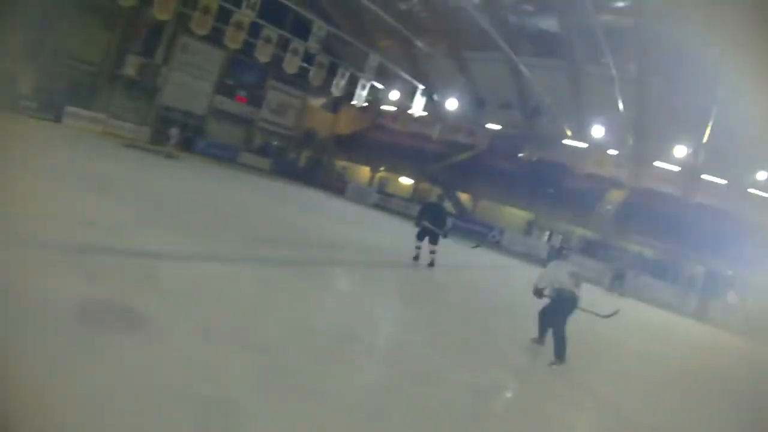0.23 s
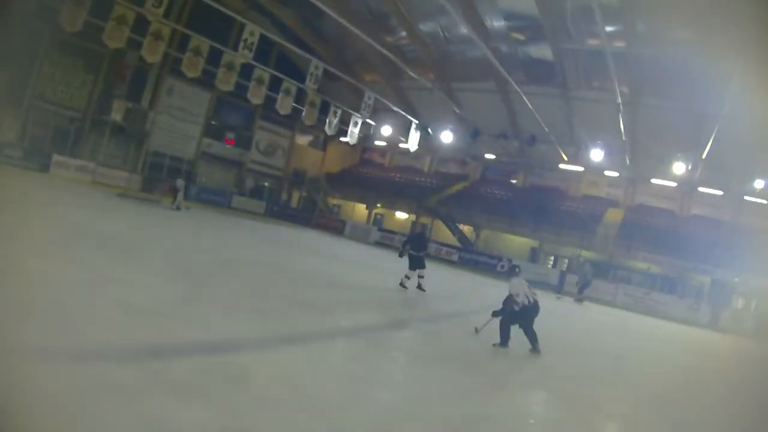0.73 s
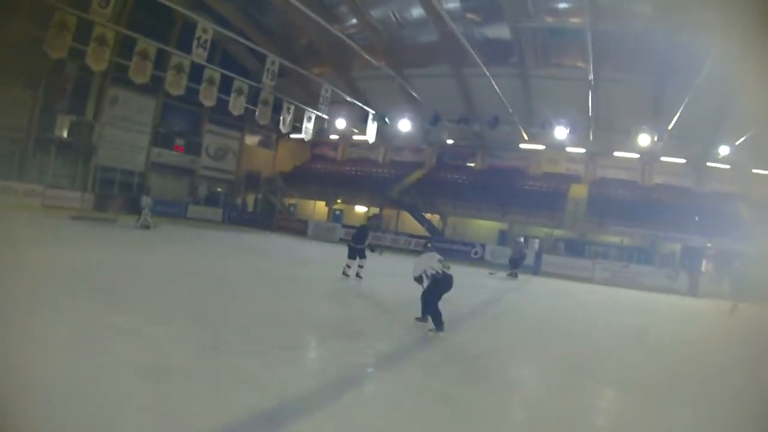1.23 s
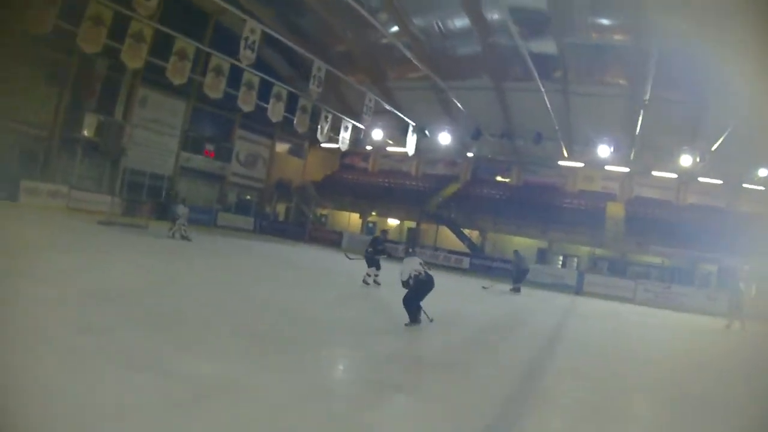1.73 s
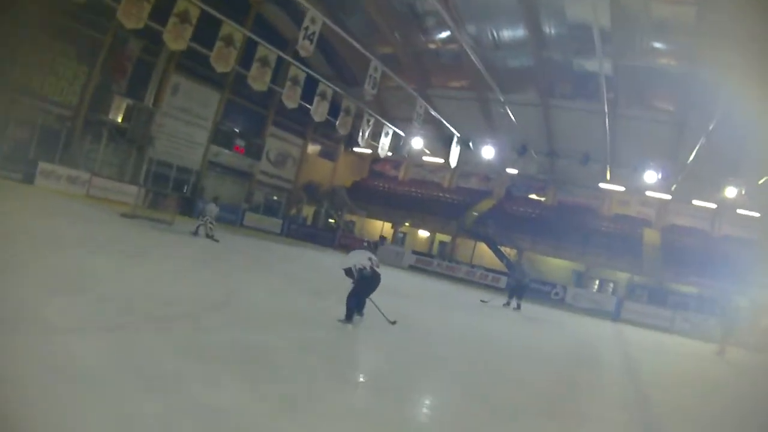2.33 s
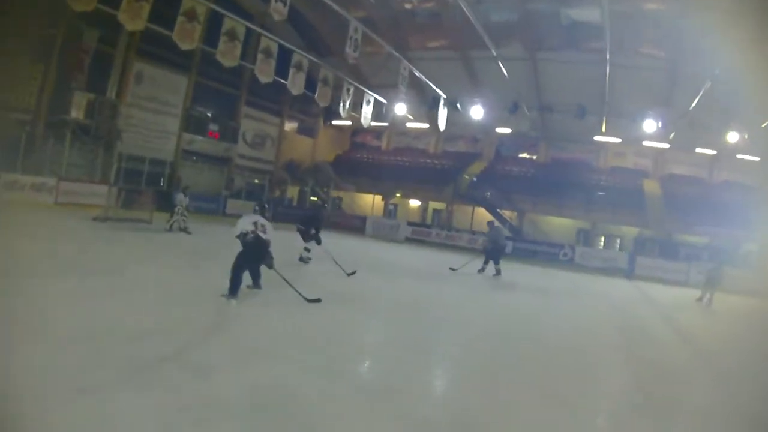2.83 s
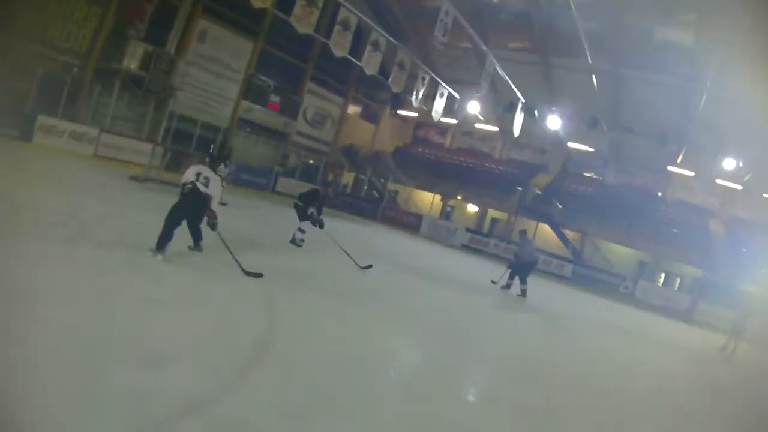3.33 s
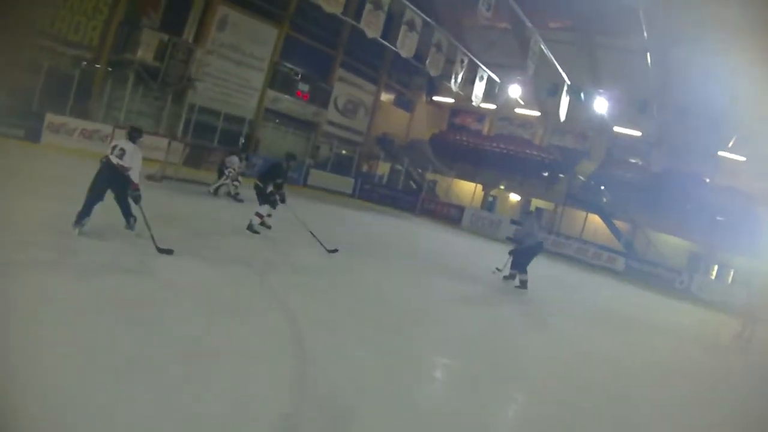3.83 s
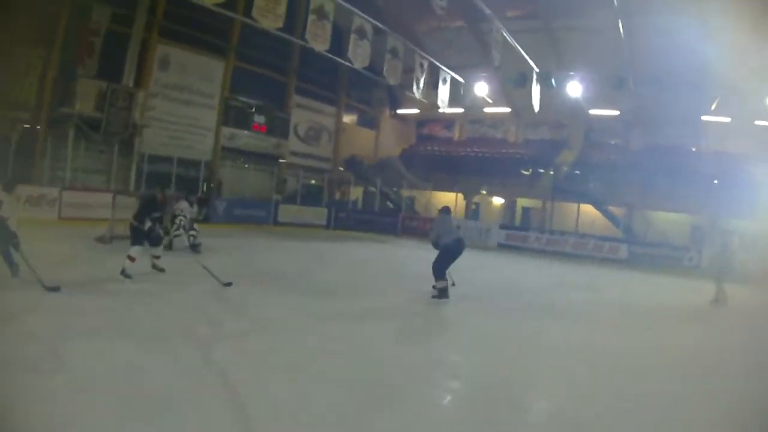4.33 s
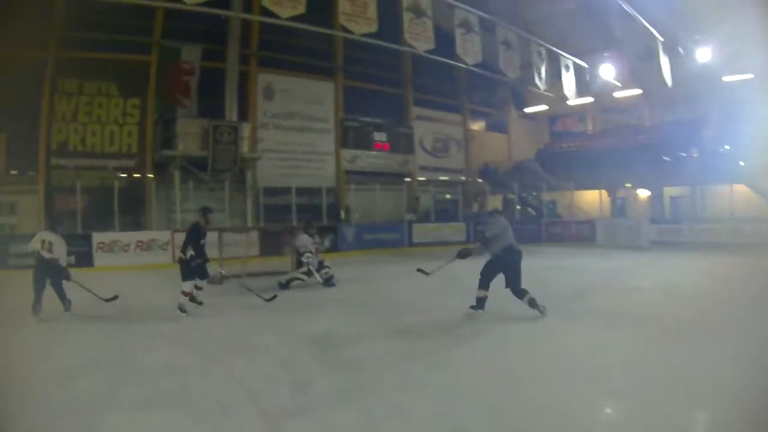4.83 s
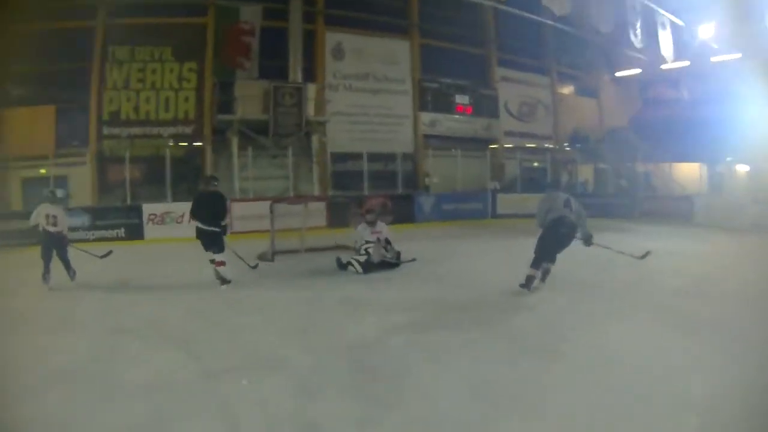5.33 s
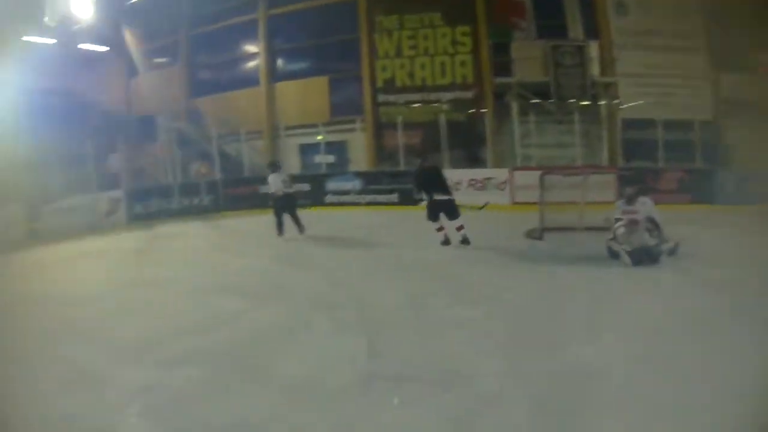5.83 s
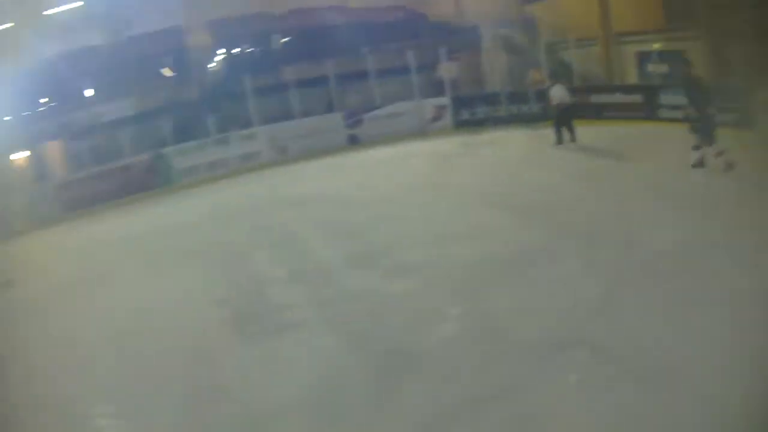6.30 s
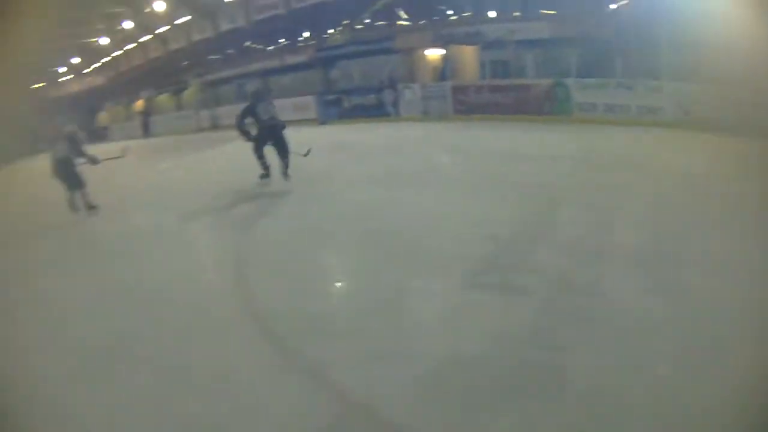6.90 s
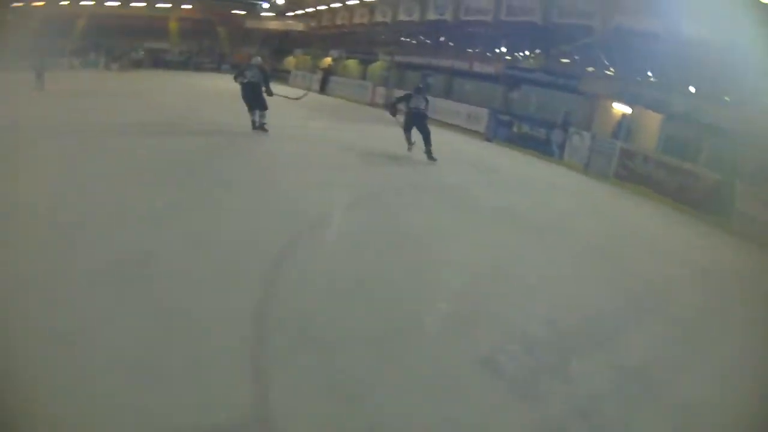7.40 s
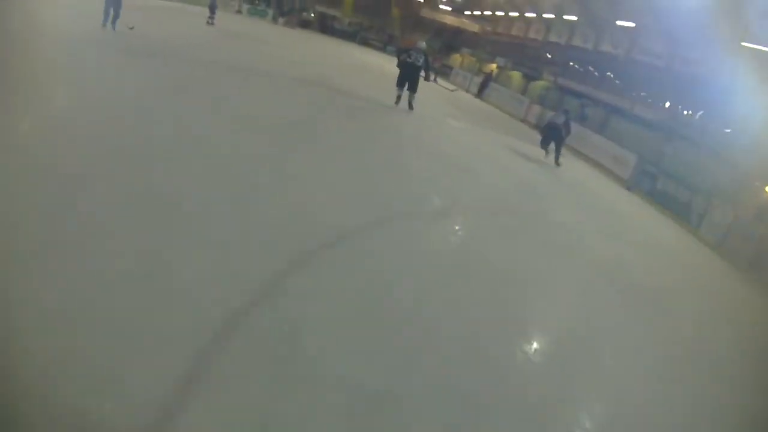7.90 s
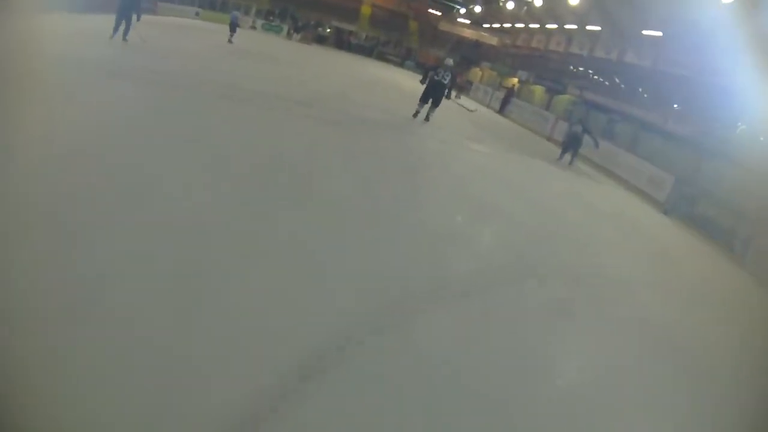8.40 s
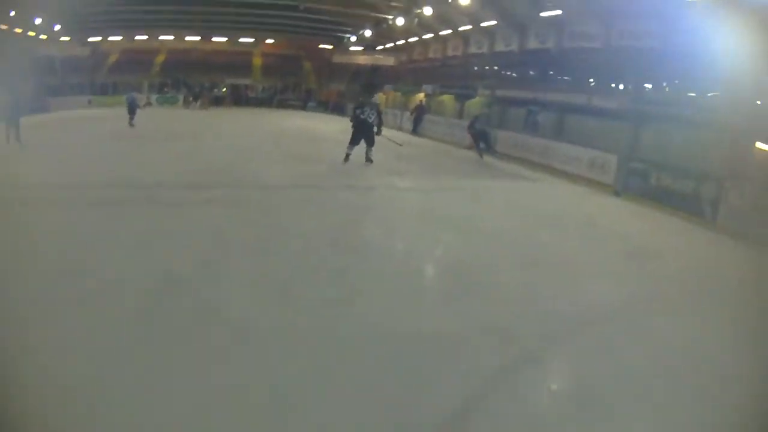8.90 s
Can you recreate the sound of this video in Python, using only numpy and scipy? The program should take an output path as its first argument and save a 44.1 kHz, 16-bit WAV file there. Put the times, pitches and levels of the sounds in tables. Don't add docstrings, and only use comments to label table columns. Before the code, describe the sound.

Skate blades bite and scrape ice in a big indoor rink, with helmet knocks, hard stick-and-puck cracks that echo, and low rumbling air.

```python
import sys
import numpy as np
from scipy import signal
from scipy.fft import rfft, irfft
from scipy.io import wavfile
from scipy.ndimage import uniform_filter1d

SR = 44100
rng = np.random.default_rng(int(sys.argv[2]) if len(sys.argv) > 2 else 0)


def wav_record(signal):
    frames = np.transpose(np.atleast_2d(signal))
    bounded = np.clip(frames, -1, 1)
    quanta = np.round(bounded * 32767).astype(np.int16)
    wavfile.write(sys.argv[1], SR, quanta)


def boost(x):
    u = np.asarray(x, float) / 20
    return 10 ** u


N = 403515
TIME = np.arange(N) / SR


def unit(x):
    return x / np.sqrt(np.mean(x ** 2))


def shape(table, hz):
    point_hz, value = np.transpose(table)
    return np.interp(np.log(hz), np.log(point_hz), value)


def band(x, lo_hz, hi_hz, order=2):
    return signal.sosfilt(signal.butter(order, [lo_hz, hi_hz], "bandpass", fs=SR, output="sos"), x)


def around(x, hz, width_hz):
    return band(x, hz - width_hz / 2, hz + width_hz / 2)


def curves(table):
    s, *columns = np.transpose(table)
    return [np.interp(TIME, s, column) for column in columns]


def walk(rate_hz):
    k = int(SR / rate_hz)
    held = np.repeat(rng.standard_normal(N // k + 1), k)
    slewed = uniform_filter1d(uniform_filter1d(held, k), k)
    return unit(slewed[:N])


def steady(x, span_s):
    local_power = uniform_filter1d(x ** 2, int(span_s * SR))
    return unit(x / np.sqrt(local_power + 0.12 * np.mean(x ** 2)))


def swells(peak_s, rise_s, fade_s, db, under=0.):
    t = TIME[::32]
    late = t - peak_s[:, None]
    rising = -late / np.abs(rise_s)[:, None]
    fading = late / np.abs(fade_s)[:, None]
    fall = np.minimum(np.maximum(rising, fading), 20)
    power = np.sum(boost(db[:, None] - 10 * fall) ** 2, axis=0)
    return np.sqrt(np.interp(TIME, t, power) + under ** 2)


def chips(scatter_db, flicker_db, rate_hz):
    size = boost(scatter_db * uniform_filter1d(rng.exponential(size=N), size=24))
    flicker = boost(flicker_db * walk(rate_hz) + flicker_db * walk(rate_hz * 3))
    return unit(rng.standard_normal(N) * size * flicker)


# time_s, carving_db, edge_brightness_db
SKATING = [(0.0, -46, -10), (0.4, -47.5, -12.5), (0.7, -49, -8), (1.1, -48, -8), (1.64, -43.5, -6.5),
           (2.3, -47, -9.5), (2.6, -46, -8), (3.1, -50, -7), (4.1, -50, -9), (4.56, -48, -9),
           (5.06, -45, -6), (5.95, -37.5, -13), (6.47, -43, -13.5), (6.85, -46, -14), (7.3, -48, -12.5),
           (7.86, -44.5, -13), (8.17, -43, -10), (9.15, -44, -10.5)]
# full_bite_s, rise_s, fade_s (per 10 dB), carving_db, spray_db
STRIDES = [(0.26, 0.096, 0.13, -45, -67), (0.446, .01, 0, -43, -72), (0.574, 0.027, 0.9, -52.5, -72),
           (0.976, 0.049, -0.14, -45.5, -84), (1.68, 0.026, 0.1, -38, -57), (1.75, .05, 0.8, -47, -69),
           (2.57, .1, 1.5, -57, -73), (3.28, 0.028, 0, -48, -79), (3.53, 0.0075, 0, -48, -84.5),
           (4.21, 0.031, 0.3, -46, -71), (4.597, .002, 0.3, -39, -70), (4.647, .004, 0.7, -40.5, -78),
           (4.84, 0.067, 0.3, -43.5, -66), (6.1, .4, -1, -57, -80), (6.256, .1, 3, -59, -80),
           (7.37, 0.022, 1.3, -47, -80), (7.67, .01, -0.2, -43, -80), (7.9, 0.07, .12, -47, -67),
           (8.2, .03, 0.5, -45, -64), (8.362, .004, 0.14, -39.5, -60), (8.421, 0.01, 0.3, -34.5, -59),
           (8.47, .02, 0.18, -36.5, -70), (8.52, .03, 0.64, -37.5, -70), (7.12, .04, -0.1, -46, -78)]


def blades():
    effort_db, edge_db = curves(SKATING)
    s, rise_s, fade_s, bite_db, spray_db = np.transpose(STRIDES)
    bite = swells(s, rise_s, fade_s, bite_db, boost(effort_db))
    ice = housing(chips(scatter_db=8.0, flicker_db=0.9, rate_hz=11.0))
    body = unit(band(ice, 1176, 3145, order=3))
    carve = body + boost(edge_db) * unit(band(ice, 4140, 5680))

    crumble = housing(chips(scatter_db=-4.0, flicker_db=3.5, rate_hz=11.0))
    grind = steady(band(crumble, 185, 900), span_s=0.14)
    weight = boost(-58) * (uniform_filter1d(bite, size=4096) / boost(-46)) ** 0.5

    flakes = chips(scatter_db=11.0, flicker_db=-1.0, rate_hz=8.5)
    spray = steady(band(flakes, 3700, 6960, order=4), span_s=0.12)
    spray_gain = swells(s, rise_s, fade_s, spray_db, boost(effort_db - 33))
    return bite * carve + weight * grind + spray_gain * spray


# start_s, length_s,
# centre_hz, width_hz, level_db
SHAVES = [(1.66, 0.088, 1140, 1030, -40), (1.65, 0.11, 4320, 460, -44), (5.07, 0.44, 4420, 570, -42),
          (4.277, 0.009, 4030, 610, -34.5), (5.069, 0.026, 430, 190, -37.5), (4.66, 0.16, 6900, 400, -71),
          (4.8, .13, 7000, 400, -64), (5.8, 0.24, 5900, 700, -68), (6.0, 0.1, 5740, 560, -67),
          (8.17, 0.16, 6600, 800, -60.5), (8.28, .13, 7000, 600, -64), (8.19, 0.12, 3500, 230, -42.5),
          (8.3, 0.11, 3530, 360, -45), (4.81, .06, 6100, 400, -61), (7.84, .12, 4700, 630, -56),
          (7.859, 0.15, 1800, 530, -43), (8.19, 0.18, 4050, 450, -44), (8.3, 0.14, 3900, 650, -48.5),
          (5.11, .014, 2050, 1700, -32), (5.07, 0.011, 4700, 500, -28), (0.58, 0.14, 210, 90, -53),
          (7, .01, 4000, 900, -48)]


def shaves():
    grain = chips(scatter_db=9.0, flicker_db=3.0, rate_hz=40.)
    out = np.zeros(N)
    for s, length, hz, width_hz, db in SHAVES:
        attack = np.clip((TIME - s) / (0.12 * length), 0, 1)
        decay = np.exp(-(np.maximum(TIME - s, 0) / length) ** 3)
        out += boost(db) * steady(around(grain, hz, width_hz), span_s=0.038) * attack * decay
    return out


# start_s, peak_db, ring_hz, length_s, hall_db
SLAPS = [(0.4415, -28.5, 3080, 0.0093, 3), (1.2022, -35, 1910, 0.013, -3), (1.675, -25, 3340, 0.0064, 4.5),
         (1.735, -28, 1790, 0.01, -7), (2.125, -42, 1590, 0.0096, 9), (5.0682, -11, 2200, 0.012, 4),
         (7.664, -39, 2920, 0.01, -3), (7.888, -38, 1900, 0.013, -6), (8.1965, -38, 3350, 0.0084, 6.5),
         (8.506, -27, 3350, 0.0037, 3), (3.418, -40, 3500, .006, -12), (3.526, -39, 2300, 0.0044, -8),
         (3.555, -39, 3200, .006, -8), (4.663, -30, 3400, 0.0066, -12), (4.787, -40, 1900, .005, 0),
         (4.823, -30, 1700, .006, -8)]
# start_s, peak_db, ring_hz, length_s, hall_db
CLACKS = [
    (4.643, -28.5, 2800, 0.0087, -7),
    (5.1205, -10, 3430, 0.009, -6.5),
    (5.131, -7.5, 3400, 0.0039, -26),
    (6.6636, -29.5, 1800, 0.0057, -1.5),
    (8.4175, -22.5, 2320, 0.0084, -2),
    (8.465, -27, 1690, 0.015, -7),
]
# start_s, peak_db, ring_hz, length_s, hall_db
PINGS = [(1.653, -36.5, 1410, 0.019, -4), (1.675, -33, 1440, .012, -13), (1.706, -35, 1650, 0.017, -10),
         (4.2805, -35.5, 3700, 0.012, -8.5), (7.369, -43.5, 2300, .012, -14),
         (8.017, -40, 2350, 0.016, -11), (8.361, -32, 2220, 0.0081, -3.5),
         (4.593, -28.5, 2370, 0.009, -3.5), (5.325, -23.5, 640, 0.011, -34),
         (8.414, -27.5, 4250, 0.015, -6), (8.419, -29.5, 2230, 0.0095, -5), (4.648, -33.5, 2370, .028, -18),
         (4.594, -36.5, 3000, .01, -12), (1.733, -37, 1700, .01, -9), (0.753, -37, 2370, .008, -15),
         (3.914, -49.5, 3360, 0.0086, 1), (4.975, -41, 1300, .01, -7), (1.6, -43, 3400, 0.009, -27),
         (4.815, -35.5, 2400, 0.011, -18)]


def cracks():
    near, far = np.zeros(N), np.zeros(N)
    t = TIME[:2048]

    def add_ring(x, hz, ring_db):
        return x + boost(ring_db) * 3 * band(x, hz / 1.06, hz * 1.06, order=1)

    for blows, ring_db in ((SLAPS, -15.5), (CLACKS, -3), (PINGS, 29)):
        for s, db, hz, length, hall_db in blows:
            length = max(length, 0.001)
            envelope = np.clip(t / 0.00073, 0, 1) * np.exp(-(t / length) ** 3 - t / 0.09)
            burst = add_ring(rng.standard_normal(len(t)) * envelope, hz, ring_db)
            blow = add_ring(signal.unit_impulse(len(t)), hz, ring_db)
            i = int(s * SR)
            near[i:i + len(t)] += boost(db) * burst * np.sqrt(length * SR / np.sum(burst ** 2))
            far[i:i + len(t)] += boost(db + hall_db) * blow * np.sqrt(length * SR / np.sum(blow ** 2))
    return housing(boost(-8.5) * near + boost(-9.0) * hall(far))


# start_s, peak_db, pitch_hz, t60_s, tap_db
JOLTS = [(0.256, -30.5, 204, 0.028, -1), (0.428, -34, 172, 0.043, -8), (0.442, -23, 176, 0.021, -5.5),
         (0.571, -41.5, 199, 0.13, -11), (1.026, -38, 237, 0.035, -14.5), (1.062, -39, 172, 0.029, 1),
         (1.198, -41, 238, 0.025, -1), (1.555, -37, 172, 0.039, -1), (3.038, -47, 213, 0.037, -8),
         (4.228, -36.5, 230, 0.03, -9), (4.292, -42, 172, 0.04, -11), (4.404, -41.5, 365, 0.033, 1),
         (4.692, -47, 172, 0.04, -11), (4.747, -35, 256, 0.033, -2), (4.805, -42, 275, 0.031, -4),
         (4.856, -36, 245, 0.029, -3), (4.958, -47, 173, 0.043, -1), (5.067, -26, 327, 0.04, 10.5),
         (6.165, -54, 169, 0.033, -8), (7.832, -47, 172, 0.04, -10), (7.899, -27.5, 205, 0.036, -20),
         (7.949, -50, 172, 0.04, -3), (9.046, -35.5, 204, 0.031, -18)]


def jolts():
    out, t = np.zeros(N + 8192), TIME[:8192]
    thud = np.sin(2 * np.pi * 96 * t) * boost(-60 * t / 0.094) * np.clip(t / 0.0077, 0, 1)
    for s, db, hz, t60, tap_db in JOLTS:
        noise = rng.standard_normal(len(t))
        swing = np.sin(2 * np.pi * hz * t * (1 - 1.0 * t)) * boost(-60 * t / t60)
        swing = swing * np.clip(t / 0.0026, 0, 1)
        contact = (1 + 0.54 * noise) * np.exp(-t / 0.00015)
        scuff = 0.31 * noise * np.exp(-t / 0.015)
        tap = band(contact + scuff, 350, 1170)
        tap = tap / np.max(np.abs(tap))
        i = int((s + 0.00315) * SR)
        out[i:i + len(t)] += boost(db) * (2.0 * swing - boost(-3.5) * thud + boost(tap_db) * tap)
    return out[:N]


def tone(table, wobble, flutter_db):
    hz, db = curves(table)
    inside_s = np.minimum(TIME - table[0][0], table[-1][0] - TIME)
    gate = np.clip(inside_s / 0.017, 0, 1)
    phase = 2 * np.pi * np.cumsum(hz * (1 + wobble * walk(60.))) / SR
    return np.sqrt(2) * gate * boost(db + flutter_db * walk(35.)) * np.sin(phase)


# time_s, pitch_hz, level_db
SQUEAL_LOW = [(3.03, 1990, -61), (3.05, 1995, -55), (3.1, 2005, -56), (3.12, 2010, -64), (3.14, 2015, -53),
              (3.17, 2025, -57), (3.19, 2029, -48.5), (3.24, 2040, -57), (3.28, 2044, -46.5),
              (3.32, 2022, -56), (3.364, 2008, -49), (3.415, 2025, -62), (3.44, 2036, -51.5),
              (3.545, 2036, -50.5), (3.58, 2056, -56), (3.7, 2045, -63), (3.81, 2030, -63),
              (3.84, 2056, -53), (3.9, 2040, -60), (3.96, 2050, -62)]
# time_s, pitch_hz, level_db
SQUEAL_HIGH = [(3.0, 3990, -62), (3.02, 3996, -54), (3.128, 4050, -50), (3.206, 4080, -54),
               (3.27, 4095, -57), (3.355, 4090, -58), (3.375, 4100, -66)]
# time_s, pitch_hz, level_db
SQUEAL_THIN = [(4.939, 5210, -58), (4.958, 5200, -55), (5.0, 5170, -57), (5.015, 5200, -66)]
# time_s, pitch_hz, level_db
SQUEAL_DULL = [(7.95, 510.1, -74), (7.99, 530.8, -64), (8.07, 529, -68), (8.1, 535, -62), (8.18, 521, -67),
               (8.28, 536, -63), (8.33, 539.5, -77)]


def squeals():
    low = boost(1.5) * tone(SQUEAL_LOW, wobble=0.00597, flutter_db=1.2)
    high = tone(SQUEAL_HIGH, wobble=0.0013, flutter_db=1.0)
    thin = tone(SQUEAL_THIN, wobble=0.0013, flutter_db=1.0)
    dull = tone(SQUEAL_DULL, wobble=0.0075, flutter_db=4.0)
    return low + high + thin + dull


# pitch_hz, width_hz, level_db, lower_group (0-1, over 0.5 is lower)
CAGE_BARS = [
    (3330, 63, 2, 0),
    (4740, 19, -18, 0),
    (2370, 49, -1, 1),
    (1530, 20, -24, 1),
    (1420, 15, -9.5, 1),
    (1090, 85, -6, 0.41),
    (724, 65, -11.5, 0),
]
# peak_s, fade_s (per 10 dB), upper_bars_db, lower_bars_db
CAGE_KNOCKS = [(0.214, 0.13, -46, -57), (0.265, 0.12, -46, -56), (0.386, -0.05, -49, -55),
               (0.446, 0.13, -43.5, -46), (0.515, 0.06, -49, -42), (0.565, 0.07, -38.5, -42),
               (0.59, 0.07, -46, -44), (0.65, .04, -56, -48), (0.715, 0, -50, -47), (0.755, 0.03, -48, -45),
               (.81, 0, -54, -46)]


def cage():
    s, fade_s, upper_db, lower_db = np.transpose(CAGE_KNOCKS)
    rise_s = np.full(len(s), 0.009)
    upper_shake = swells(s, rise_s, fade_s, upper_db)
    lower_shake = swells(s, rise_s, fade_s, lower_db)
    buzz = chips(scatter_db=-10.0, flicker_db=-0.5, rate_hz=25.)
    out = np.zeros(N)
    for hz, width_hz, db, lower in CAGE_BARS:
        shake = lower_shake if lower > 0.5 else upper_shake
        out += boost(db) * shake * steady(around(buzz, hz, width_hz), span_s=0.053)
    return out


# frequency_hz, level_db
RUMBLE = [(2.4, -12), (4.0, 3), (16, -2.5), (42, -4.5), (71, -6), (103, -8.5), (135, -22.5), (160, -27.5),
          (269, -23), (300, -34), (390, -33), (660, -120)]
# time_s, rumble_db
DRAUGHT = [(0.0, -35), (0.7, -42), (1.4, -37), (1.65, -42), (1.75, -30.5), (2.1, -32.5), (2.3, -36),
           (2.9, -35.5), (3.15, -34), (3.87, -39), (4.5, -38), (5.17, -38.5), (5.7, -33.5), (6.5, -36),
           (7.1, -32.5), (7.5, -40), (7.7, -33), (8.2, -35.5), (8.8, -37)]
# peak_s, rumble_db, fade_s (per 10 dB), upper_rumble_db (relative)
GUSTS = [(0.003, -29, 0, -7), (0.28, -26, 0.11, -9.5), (0.43, -29.5, 0.08, -4), (0.6, -29.5, 0.17, -5.5),
         (0.9, -30, 0.04, -18), (1.04, -28, 0.05, -6), (1.21, -32.5, 0.07, -7),
         (1.58, -17.5, 0.0341, -11.5), (2.45, -40, 0, -6), (2.65, -28, -0.02, -10.5), (3.03, -24.5, 0, -11),
         (4.02, -43, -1.1, -18), (4.21, -32, 0.13, -8), (4.42, -31, 0.16, -7), (4.77, -27.5, 0.12, -12.5),
         (4.94, -24.5, 0.03, -14), (5.08, -35, 0, -2), (5.25, -25, 0, -14), (5.4, -27, -0.03, -12),
         (5.6, -33, -1, -22), (5.85, -28.5, -0.06, -8.5), (6.01, -37, -0.5, -13), (6.17, -26.5, -0.03, -5),
         (6.43, -33.5, -0.2, -9), (7.36, -29.5, 0.1, -13), (7.95, -31, -0.22, -10.5),
         (8.02, -32, -0.2, -23), (8.28, -27, -0.1, -22), (8.42, -28.5, 0, -10), (8.7, -33.5, -0.23, -6.5),
         (8.85, -30, 0, -10), (9.05, -27, 0, -6)]


def air():
    draught = boost(curves(DRAUGHT)[0])
    s, db, fade_s, upper_db = np.transpose(GUSTS)
    rise_s = 0.82 * fade_s
    hz = np.fft.rfftfreq(N, 1 / SR) + 1e-3
    rumble = irfft(rfft(rng.standard_normal(N)) * boost(shape(RUMBLE, hz)), N)
    low = unit(band(steady(band(rumble, 3.84, 63.5), span_s=0.089), 2, 79))
    upper = steady(band(rumble, 62.8, 240), span_s=0.057) * boost(1.76 * walk(25.))
    upper = unit(band(upper, 45, 197))
    low_gain = swells(s, rise_s, fade_s, db, draught)
    upper_gain = swells(s, rise_s, fade_s, db + upper_db, draught * boost(-11))
    hum = boost(-66) * unit(around(rumble, 247.4, 42))
    settling = boost(-30) * np.exp(-TIME / 0.004)
    return hum + settling + low_gain * low + upper_gain * upper


# frequency_hz, level_db
HOUSING = [(120, -38), (220, -15.5), (300, -7), (465, -9.5), (576, -6.5), (661, -9.5), (858, -5.5),
           (1080, -6.5), (1680, 0), (2020, -1), (2360, -4.5), (2880, -4), (3460, 3.5), (5570, -23),
           (7800, -34), (10100, -58.5), (17200, -120)]
# centre_hz, width_hz, level_db
CAVITY = [(864, 29, 4), (1197, 90, 4.5), (1445, 80, 1), (1727, 203, 4), (2352, 160, 9.5), (2800, 140, -2),
          (3224, 85, 2), (3445, 84, 3.5), (3630, 56, 2), (4330, 120, 2)]


def housing(x, size=2048):
    hz = np.fft.rfftfreq(size, 1 / SR) + 1
    db = shape(HOUSING, hz)
    for peak_hz, width_hz, peak_db in CAVITY:
        db = db + peak_db / (1 + (2 * (hz - peak_hz) / width_hz) ** 2)
    cepstrum = irfft(np.log(boost(np.maximum(db, -70))))
    cepstrum[1:size // 2] *= 2
    cepstrum[size // 2 + 1:] = 0
    response = irfft(np.exp(rfft(cepstrum)))
    return signal.fftconvolve(x, response / np.sqrt(np.sum(response ** 2)))[:N]


# frequency_hz, t60_s
HALL_T60 = [(250, 4.5), (500, 4.1), (1000, 3.26), (2000, 3.66), (4000, 2.1), (8000, 1.2)]


def hall(x):
    t = TIME[:3 * SR]
    tail = np.zeros(len(t))
    for hz in 200 * 2 ** (np.arange(17) / 3):
        third = band(rng.standard_normal(len(t)), hz / 1.17, hz * 1.116, order=1)
        tail += third * boost(-60 * t / shape(HALL_T60, hz))
    build_up = 0.29 + 0.66 * (1 - np.exp(-(t / 0.046) ** 3))
    early_fall = 1 + 0.22 * np.exp(-t / 1.1)
    tail = tail * build_up * early_fall * boost(0.085 * walk(13.5)[:len(t)])
    return signal.fftconvolve(x, tail / np.sqrt(np.sum(tail ** 2)))[:N]


def scene():
    mono = blades() + shaves() + cracks() + jolts() + squeals() + cage() + air()
    return np.array([mono, mono])


def following_hiss(dry):
    power = (2.5 * np.diff(band(dry[0], 500, 6000), prepend=0)) ** 2
    loudness = np.sqrt(uniform_filter1d(power, size=24) + 1e-12)
    before = np.sqrt(uniform_filter1d(power, size=512, origin=255) + 1e-12)
    floor = boost(-67)
    follow = boost(-26) * loudness ** 1.143
    flare = boost(-25) * np.maximum(loudness - 1.8 * before, 0)
    hiss = rng.standard_normal(dry.shape) * np.sqrt(floor ** 2 + follow ** 2 + flare ** 2)
    return signal.sosfilt(signal.butter(1, 900, "highpass", fs=SR, output="sos"), hiss)


def roll_off(x):
    return signal.sosfilt(signal.butter(12, 15770, fs=SR, output="sos"), x)


def record(dry):
    uneven = boost(-46) * band(dry[0], 10, 300, order=1) * np.array([[1], [-1]])
    mix = dry + following_hiss(dry) + uneven
    top_cut = signal.ellip(10, 0.2, 60, 15750, fs=SR, output="sos")
    mix = signal.sosfilt(top_cut, mix) - 0.0008
    return roll_off(mix)


dry = scene()
out = record(dry)
wav_record(out)
```